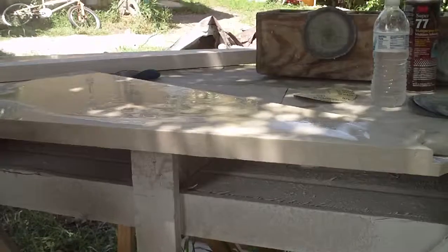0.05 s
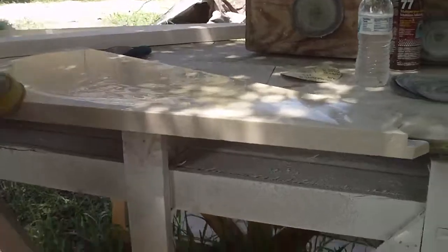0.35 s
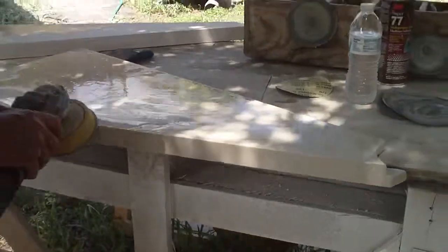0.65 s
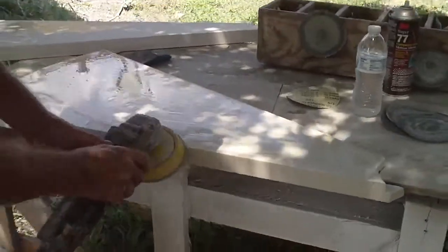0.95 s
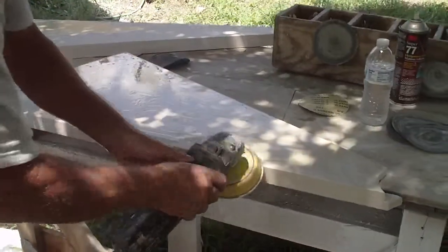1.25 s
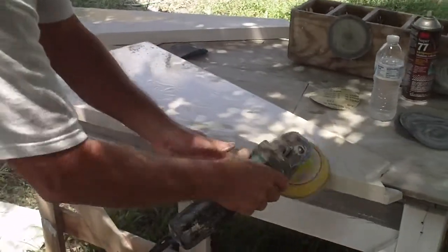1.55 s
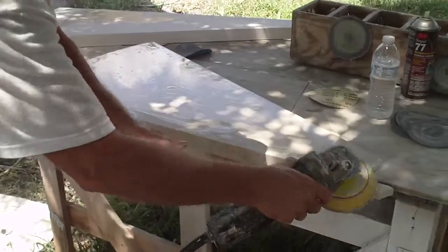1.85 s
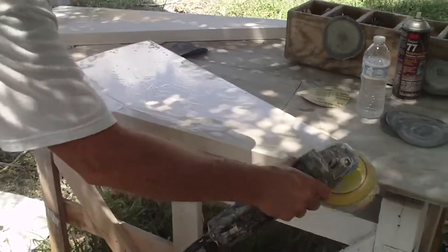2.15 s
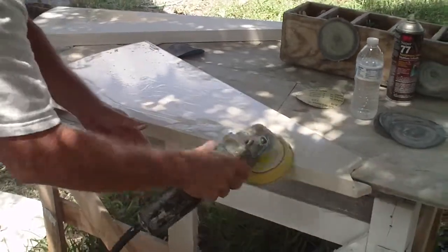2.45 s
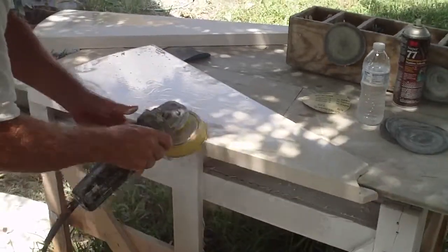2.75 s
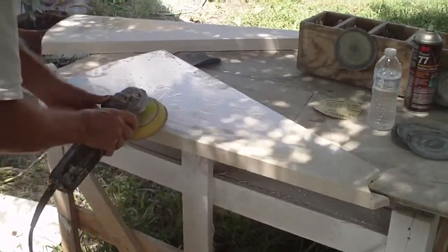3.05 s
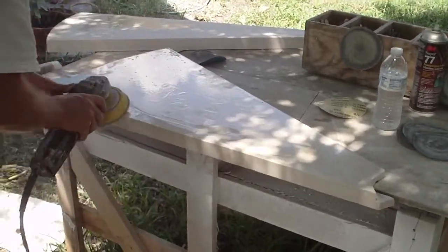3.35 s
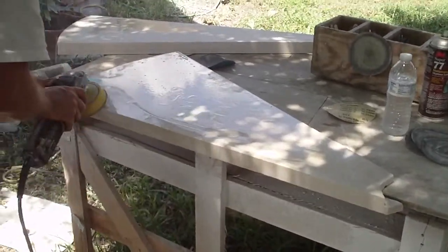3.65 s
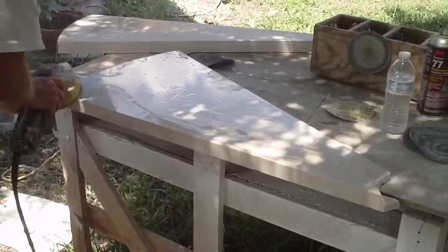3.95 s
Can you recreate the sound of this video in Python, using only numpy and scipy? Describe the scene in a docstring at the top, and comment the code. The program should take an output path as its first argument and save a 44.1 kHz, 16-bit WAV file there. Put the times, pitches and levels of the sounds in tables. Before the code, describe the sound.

A handheld power polisher drones and whines, its pad hissing over wet stone.

```python
"""A handheld electric polisher runs along a wet stone slab, outdoors and close by. From the start, gears drone
and whine on multiples of the 58 Hz spindle rate, teeth clatter in the housing, the motor hums and the wet pad
hisses in pulses. In the first 0.9 s its rim ticks on the edge. By 1.3 s the tool is on the near edge and the
gearbox sings near 1 kHz under load; single gear orders ring out in turn until 2 s. The rim ticks twice more at
3.6 s, then the speed sags under pressure and one more gear order rings out from 3.8 s."""
import sys
import numpy as np
from scipy.fft import rfft, irfft, next_fast_len
from scipy.io import wavfile
from scipy.ndimage import map_coordinates

SR = 44100
rng = np.random.default_rng(int(sys.argv[2]) if len(sys.argv) > 2 else 0)


def store_pcm(level_fs):
    """Save levels as 16-bit WAV."""
    pcm = np.round(np.clip(level_fs, -1, 1) * 32767).astype(np.int16)
    wavfile.write(sys.argv[1], SR, np.atleast_2d(pcm).T)


N = 176400


def amp(db):
    """Decibels to gain."""
    return np.exp(np.asarray(db) * np.log(10) / 20)


def unit(x):
    """Scale to rms 1."""
    return x / np.sqrt(np.mean(x ** 2) + 1e-20)


def curves(rows):
    """One value per sample for each column after the time."""
    times_s, *columns = np.transpose(rows)
    return [np.interp(np.arange(N) / SR, times_s, column) for column in columns]


def wobble(rate_hz):
    """Smooth random curve through rate_hz knots a second."""
    knots = rng.standard_normal(2048)
    grid = np.arange(0, N + 32, 32)
    return np.interp(np.arange(N), grid, map_coordinates(knots, [grid * rate_hz / SR], mode="wrap"))


def filtered(x, response):
    """Apply a complex frequency response."""
    size = next_fast_len(N + SR // 2)
    return irfft(rfft(x, size) * response(np.fft.rfftfreq(size, 1 / SR)), size)[:N]


def coloured(x, spectrum):
    """Shape x by (f/Hz, level/dB) points; rms 1."""
    hz, db = np.transpose(spectrum)
    return unit(filtered(x, lambda f: amp(np.interp(np.log(f + 1), np.log(hz + 1), db))))


def partial(turns, order, flutter_db, smear_rad):
    """One order (multiple of the spindle rate), fluttering in level and phase; rms 1."""
    offset_cycles = 0.85 * rng.random()
    phase = 2 * np.pi * (order * turns + offset_cycles) + smear_rad * wobble(22.25)
    return unit(amp(flutter_db * wobble(12)) * np.sin(phase))


# Low gear tones: order, far-end level/dB, near-edge level/dB
DRONE_ORDERS = [(1, -40.5, -52), (2, -35, -39.5), (5, -42, -35.5), (6, -42, -42.5), (7, -27, -30.5),
                (8, -32, -34), (9, -28.5, -41.5), (10, -25, -34.5), (11, -35.5, -39.5), (12, -34, -31.5),
                (13, -43, -27), (14, -24.5, -31), (19, -34, -38.5), (21, -41.5, -43), (22, -36, -63),
                (24, -31, -63), (25, -55, -47.5)]
# Drone, easing while the pad bears lightly: t/s, level/dB
DRONE_LEVEL = [(.2, 0.5), (.27, -2.5), (.6, 0), (1.1, 0.9), (2.6, 0.7)]
# Extra gain of SWELL_ORDERS: t/s, level/dB
SWELL_LEVEL = [(.9, -3), (1.95, -2), (2.3, -0.5), (2.55, 0.5), (2.66, -2.5), (3.2, 0), (3.5, 4), (4, -1)]
SWELL_ORDERS = (12, 13, 14)


def gear_drone(turns, near):
    """Low gear orders shift in balance along the slab."""
    drone_db, = curves(DRONE_LEVEL)
    swell_db, = curves(SWELL_LEVEL)
    out = np.zeros(N)
    for order, far_db, near_db in DRONE_ORDERS:
        db = drone_db + (1 - near) * far_db + near * near_db + swell_db * (order in SWELL_ORDERS)
        out += amp(db) * partial(turns, order, flutter_db=1.78, smear_rad=0.21)
    return out


# Gearbox song: t/s, level/dB for each of SONG_ORDERS
SONG_LEVELS = [(0.0, -33, -23, -42), (0.05, -35, -22, -44), (0.17, -24.5, -26, -39), (0.43, -37, -30, -34),
               (0.65, -36, -24.5, -22), (0.76, -18.5, -23, -30), (1.04, -18.5, -31, -26),
               (1.18, -31, -23, -18.5), (1.28, -15, -21.5, -32), (1.34, -16.5, -18, -24),
               (1.39, -22, -25, -29), (1.55, -22.5, -19.5, -38), (1.7, -13.5, -21.5, -30),
               (1.97, -14, -27, -37), (2.14, -16.5, -23, -22), (2.57, -16.5, -29, -26),
               (2.66, -22, -42, -24), (2.81, -15.5, -31, -23), (2.88, -21.5, -36, -24),
               (2.97, -21, -36, -19), (3.05, -14.5, -24, -25), (3.21, -17.5, -31, -24),
               (3.32, -18, -24, -32), (3.73, -17.5, -25, -21.5), (3.83, -19.5, -42, -17.5),
               (4.0, -28, -37, -23.5)]
SONG_ORDERS = (17, 16, 15)


def gear_song(turns):
    """Three orders near 1 kHz sing under load, fluttering fast as the pad grabs."""
    out = np.zeros(N)
    for order, db in zip(SONG_ORDERS, curves(SONG_LEVELS)):
        tone = partial(turns, order, flutter_db=0.85, smear_rad=0.077)
        rough_db = 0.77 * wobble(90)
        out += amp(db + rough_db) * tone
    return out


# High gear tones: order, level/dB
WHINE_ORDERS = [(46, -3.5), (48, -8), (49, 2), (50, -1.5)]
# Whine envelope: t/s, level/dB
WHINE_LEVEL = [(0, -26), (.35, -31), (1.1, -36), (1.72, -34), (2.05, -31.5), (2.3, -29.5), (2.6, -34.5),
               (3.0, -31), (3.3, -33), (4, -35)]


def gear_whine(turns):
    """High gear orders in the main resonance of the housing."""
    tones = sum(amp(db) * partial(turns, order, flutter_db=2.5, smear_rad=0.72)
                for order, db in WHINE_ORDERS)
    return amp(curves(WHINE_LEVEL)[0]) * tones


# Gearbox housing modes: f/Hz, width/Hz, far-end level/dB, near-edge level/dB
HOUSING_MODES = [(1370, 150, -31, -9), (1690, 62, -30, -5.5), (1950, 200, -5, -5.5),
                 (2176, 150, -4.5, -4.5), (2416, 110, 4.5, -21), (2530, 230, -0.5, -7.5),
                 (2910, 270, 0, -1), (3140, 255, 0.5, -5), (4180, 130, -1.5, -13)]


def tooth_clatter(turns, near, teeth=7, wear_db=4.5, scatter_db=3.5, jitter_s=0.00003):
    """Unevenly worn teeth knock in the same pattern each turn and ring the housing."""
    tooth = np.arange(int(turns[-1] * teeth))
    jitter, scatter = rng.standard_normal((2000, 2))[tooth].T
    wear_shift = 0.25 * rng.standard_normal(teeth)[tooth % teeth]
    at = np.interp((tooth + wear_shift) / teeth, turns, np.arange(N)) + jitter_s * SR * jitter
    force = amp(wear_db * np.cos(2 * np.pi * tooth / teeth) + scatter_db * scatter)
    knocks = np.bincount(np.clip(at, 0, N - 1).astype(int), force, N)
    mode_hz, width_hz, far_db, near_db = np.transpose(HOUSING_MODES)

    def ring(levels_db):
        """Knocks through parallel resonances of alternating sign."""
        def response(f):
            return sum((-1) ** k * amp(db) * 1j * f * width / (hz ** 2 - f ** 2 + 1j * f * width)
                       for k, (hz, width, db) in enumerate(zip(mode_hz, width_hz, levels_db)))
        return unit(filtered(knocks, response))
    return (1 - near) * ring(far_db) + near * ring(near_db)


def friction(spectrum, grain_db):
    """Grit under the pad: grainy noise."""
    return coloured(rng.standard_normal(N) * amp(grain_db * wobble(450)), spectrum)


def pulse(turns, depth_db):
    """Gain with one short crest per turn."""
    angle = 2 * np.pi * turns
    return unit(amp(depth_db * (np.cos(angle) + 0.4 * np.cos(2 * angle) + 0.25 * np.cos(3 * angle))))


# Echoes off slab, bench and body: delay/s, level/dB
ECHOES = [(.0017, -21.5), (.0031, -10), (.0052, -15), (.0083, -19), (0.0128, -6.5), (.019, -4)]


def reflections(x, sway_s=0.00005, sway_hz=2):
    """Nearby surfaces comb the sound; the notches drift as the tool moves."""
    echoes = sum(amp(db) * map_coordinates(x, [np.arange(N) - SR * (delay_s + sway_s * wobble(sway_hz))])
                 for delay_s, db in ECHOES)
    return np.std(x) * unit(x + echoes)


# Friction spectra, low to high; sizzle is the wet pad's whistling band: f/Hz, level/dB
GRIND_SPECTRUM = [(25, -26), (55, -5.5), (200, -6.5), (260, -11.5), (560, -9), (720, -0.5), (950, 1),
                  (1100, -4.5), (1300, -12), (1700, -15.5), (2600, -56)]
RUB_SPECTRUM = [(650, -52), (1100, -2.5), (1290, -20), (1420, 1), (1550, -7), (1950, -7), (2080, -5),
                (2440, -1.5), (2850, -4.5), (3400, -7.5), (4040, -4), (4450, -6.5), (4860, -2),
                (6500, -5.5), (8450, -59), (14300, -120)]
HISS_SPECTRUM = [(3400, -37), (5400, -7), (6350, -2.5), (6700, -4.5), (7050, -0.5), (7650, 0), (8000, -1.5),
                 (8600, -1.5), (9500, -7), (10100, -4), (11200, -5.5), (11700, -15.5), (12350, -14),
                 (13100, -5), (15250, -9)]
SIZZLE_SPECTRUM = [(7500, -27), (8150, -1), (8400, 0), (8700, -10), (9200, -42)]
# Friction envelopes: t/s, relative level/dB
GRIND_LEVEL = [(0, -27), (.35, -27.5), (.8, -27.5), (1.5, -25), (2.05, -24.5), (2.5, -26.5), (3.4, -29.5),
               (4, -26.5)]
SIZZLE_LEVEL = [(0, -32), (.25, -29), (.45, -23), (.65, -30.5), (.95, -26), (1.2, -33), (2.5, -30.5),
                (3.05, -40), (3.35, -28), (3.65, -36)]
# Pad pulsing: t/s, rub depth/dB, hiss depth/dB
PULSE_DEPTH = [(0, -2, 0.5), (.35, 2, 2.5), (.8, 3, 1.5), (1.9, 2.5, 0.2), (2.45, 1.6, 1.3),
               (3.4, 0.5, 1.5), (4, 2, -0.3)]


def wet_pad(turns, near, rub_db, hiss_db):
    """The pad grinds, rubs and hisses in a pulse with each turn; it chatters more at the far end."""
    pad_turns = 0.97 * turns + 0.025 * wobble(25)  # slips behind the spindle
    chatter = amp((1.15 - 0.44 * near) * wobble(130) + 0.53 * wobble(500))
    rub_depth_db, hiss_depth_db = curves(PULSE_DEPTH)
    grind = amp(curves(GRIND_LEVEL)[0] - 0.47) * friction(GRIND_SPECTRUM, grain_db=0)
    rub = amp(rub_db + 1.5) * reflections(friction(RUB_SPECTRUM, grain_db=0.8))
    hiss = amp(hiss_db + 0.7) * friction(HISS_SPECTRUM, grain_db=0.8)
    sizzle = amp(curves(SIZZLE_LEVEL)[0] + 1.5) * friction(SIZZLE_SPECTRUM, grain_db=2.5)
    lows = grind * pulse(turns, depth_db=3.5)
    mids = rub * pulse(pad_turns, rub_depth_db)
    highs = reflections(hiss + sizzle) * pulse(pad_turns, hiss_depth_db)
    return lows + chatter * (mids + highs)


# Motor whistle: t/s, level/dB
WHISTLE_LEVEL = [(.2, -49), (.5, -28.5), (.8, -31), (1.28, -44), (1.42, -25), (1.55, -27), (1.7, -50),
                 (2.3, -35), (3.35, -49), (3.5, -24), (3.7, -42)]


def motor(turns, hum_hz=119.9, hum_db=-38):
    """Mains hum, beating with gear order 2, and a thin whistle that follows the speed."""
    hum = unit(np.sin(2 * np.pi * hum_hz * np.arange(N) / SR))
    whistle = partial(turns, order=141, flutter_db=2, smear_rad=0.35)
    return amp(hum_db) * hum + amp(curves(WHISTLE_LEVEL)[0]) * whistle


# Rim catches: t/s, relative level/dB
CATCHES = [(0.0209, -11.5), (0.0657, -11), (0.1989, -12), (0.2054, -14), (0.2409, -15), (0.267, -15),
           (0.2972, -9.5), (0.3222, -16), (0.3745, -12.5), (0.396, -14), (0.4209, -13), (0.4728, -11.5),
           (0.4933, -13), (0.5292, -14), (0.5656, -12.5), (0.7223, -14), (0.7746, -14), (0.8659, -17),
           (3.5853, -15), (3.6052, -13)]
# Ring modes and rasp spectrum of a catch: f/Hz, level/dB
CATCH_MODES = [(1940, -8.5), (2130, -4.5), (2380, -17)]
RASP_SPECTRUM = [(1400, -29), (2000, 3), (2900, -11), (6500, -13), (12000, -22)]


def rim_catches(gain_db=2.5, rasp_db=-10, decay_s=0.0036):
    """The pad's rim catches on the slab's edge: crisp ticks, each a short ring and a rasp."""
    out = np.zeros(N + SR)
    t = np.arange(SR // 20) / SR
    rasp = amp(rasp_db) * coloured(rng.standard_normal(N), RASP_SPECTRUM)
    for start_s, level_db in CATCHES:
        span = round(start_s * SR) + np.arange(len(t))
        detunes = 1 + 0.048 * rng.standard_normal(len(CATCH_MODES))
        ring = sum(amp(db) * np.sin(2 * np.pi * hz * detune * t)
                   for (hz, db), detune in zip(CATCH_MODES, detunes))
        out[span] += amp(level_db + gain_db) * (ring + rasp[span]) * np.exp(-t / decay_s)
    return out[:N]


# Brief gear tones: start t/s, end t/s, order, level/dB
FLARES = [(0.662, 0.79, 53, -30), (0.72, 0.795, 50, -27), (.75, .91, 52, -32), (.9, 1.121, 54, -28.5),
          (1.165, 1.3, 48, -28), (1.237, 1.38, 19, -32), (1.32, 1.662, 49, -27.5), (1.49, 1.65, 48, -26),
          (1.8, 1.98, 111, -32), (3.8, 4.05, 18, -27)]


def gear_flares(turns):
    """Single gear orders ring out in turn as the pad is pushed along."""
    out = np.zeros(N)
    for start_s, end_s, order, db in FLARES:
        progress = np.clip((np.arange(N) / SR - start_s) / (end_s - start_s), 0, 1)
        arch = np.sqrt(np.abs(np.sin(np.pi * progress)))
        out += amp(db) * arch * partial(turns, order, flutter_db=1, smear_rad=0.28)
    return out


# Spindle rate, sagging when the pad is pressed harder: t/s, f/Hz
SPINDLE_RATE = [(0.0, 58.05), (0.07, 58.46), (0.22, 58.24), (0.51, 58.12), (0.68, 58.44), (0.79, 57.86),
                (1.16, 58.52), (1.27, 57.67), (1.57, 58.3), (1.7, 57.54), (1.96, 57.35), (2.12, 58.16),
                (2.54, 57.91), (2.67, 57.07), (2.76, 57.6), (2.87, 56.94), (3.05, 57.7), (3.21, 57.35),
                (3.34, 57.9), (3.71, 57.8), (3.87, 56.4), (4.0, 56.4)]
# Place on the slab: t/s, nearness (0 far end, 1 near edge)
NEARNESS = [(0.3, 0.06), (0.8, 0.38), (1.3, 0.96), (3.7, 0.97), (4.0, 0.91)]
# Pad contact: t/s, relative level/dB of clatter, rub, hiss
CONTACT_LEVELS = [(0, -21.5, -21, -15), (0.22, -18, -26, -15.5), (0.265, -23, -31, -20),
                  (0.31, -21, -29, -16.5), (0.47, -20, -27.5, -17.5), (0.56, -20, -21.5, -17.5),
                  (0.68, -20, -21, -18), (0.77, -21, -24.5, -18.5), (0.94, -23, -21.5, -18.5),
                  (1.1, -23.5, -23.5, -19.3), (1.3, -21.5, -22, -18), (1.6, -26.5, -21.5, -18),
                  (1.72, -24.5, -23.5, -18.5), (1.9, -22.5, -22.5, -18), (2.2, -25.5, -24.5, -19.5),
                  (2.32, -29, -22.5, -18.5), (2.48, -26.5, -23.5, -19.5), (2.73, -22.5, -23, -16),
                  (2.85, -23, -23, -17.5), (3.35, -22, -24, -17.5), (3.7, -22, -24.0, -19),
                  (3.9, -20.5, -21.5, -16.5)]


def scene():
    """One spindle drives the gears and the pad."""
    spindle_hz, = curves(SPINDLE_RATE)
    near, = curves(NEARNESS)
    clatter_db, rub_db, hiss_db = curves(CONTACT_LEVELS)
    turns = np.cumsum(spindle_hz) / SR
    gears = gear_drone(turns, near) + gear_song(turns) + gear_whine(turns) + gear_flares(turns)
    clatter = amp(clatter_db - 3) * tooth_clatter(turns, near)
    stone = wet_pad(turns, near, rub_db, hiss_db) + rim_catches()
    return (gears + clatter + stone + motor(turns))[None]


def record(dry):
    """Soft peak limit, then a brick-wall low-pass."""
    ceiling, cutoff_hz = 0.95, 15350
    rounded = dry[0] / (1 + np.abs(dry[0] / ceiling) ** 8) ** (1 / 8)
    return filtered(rounded, lambda hz: hz < cutoff_hz)[None]


dry = scene()
out = record(dry)
store_pcm(out)
```